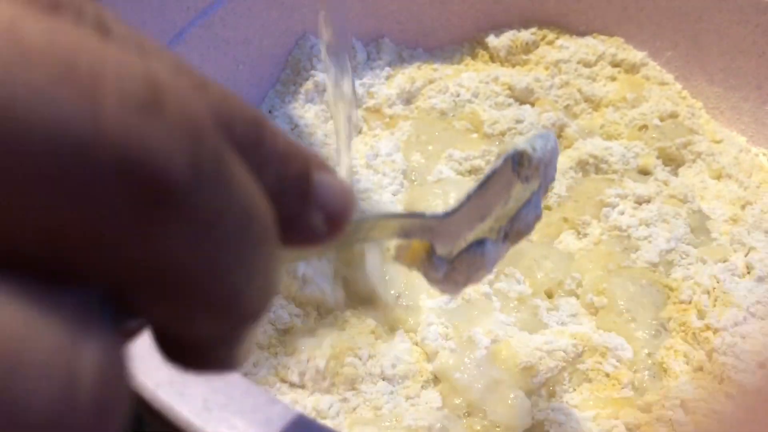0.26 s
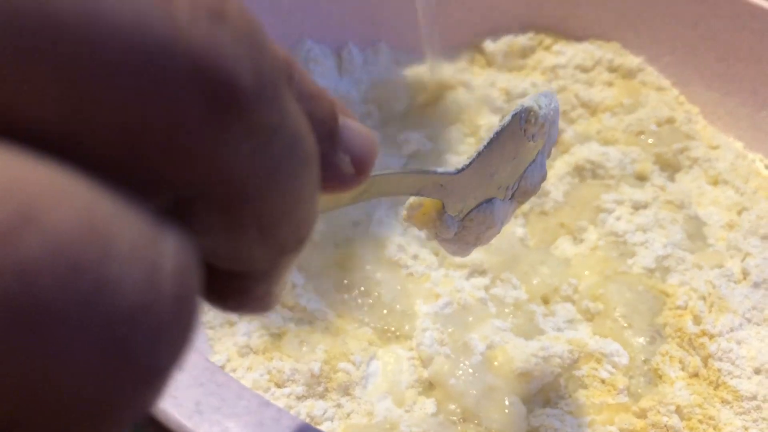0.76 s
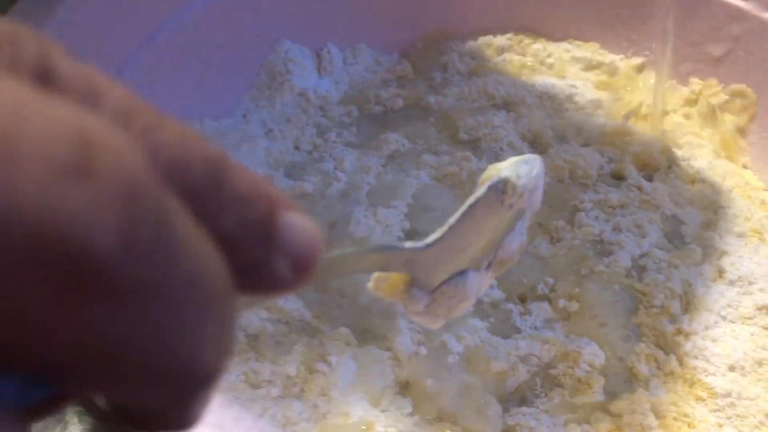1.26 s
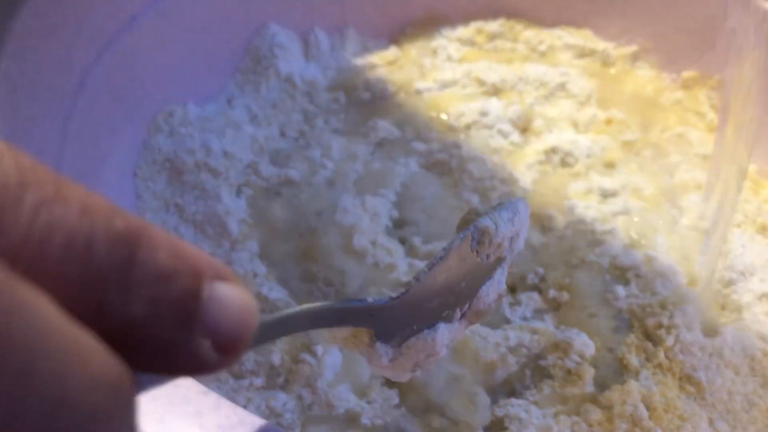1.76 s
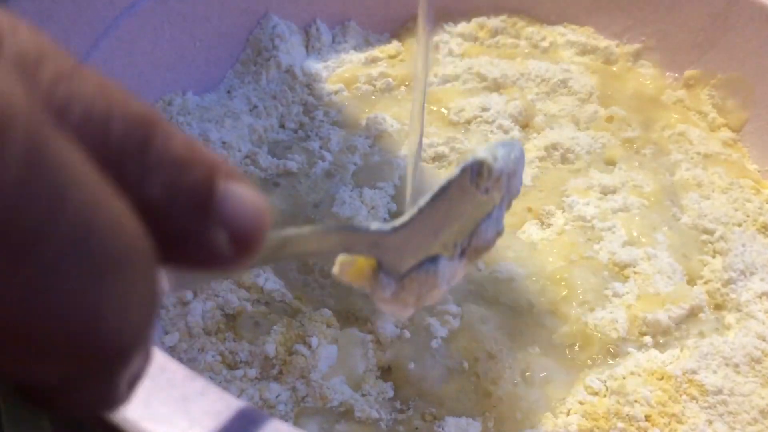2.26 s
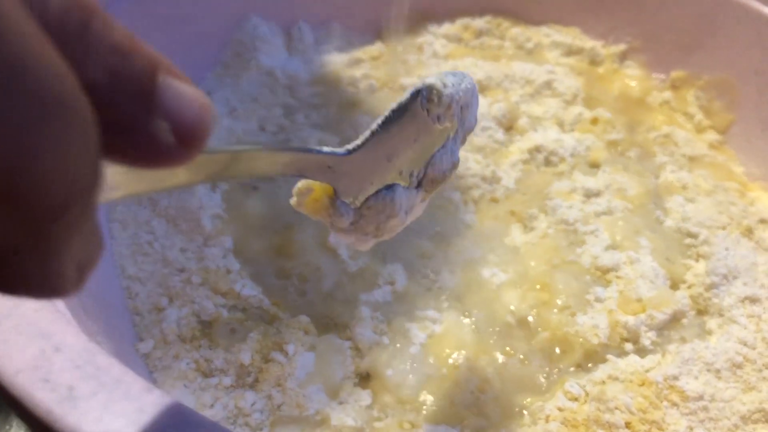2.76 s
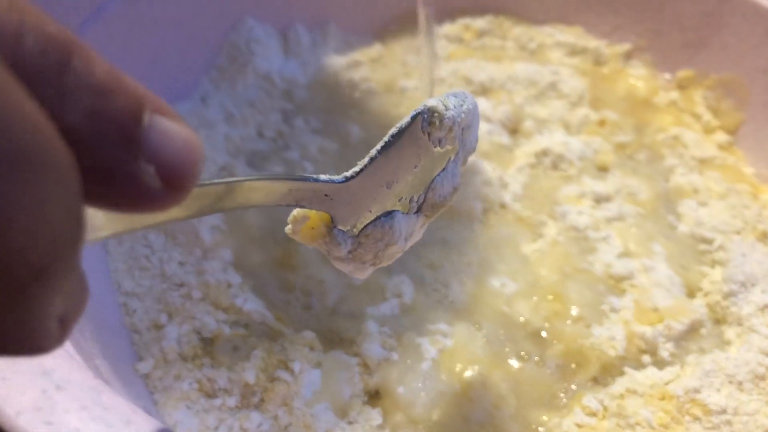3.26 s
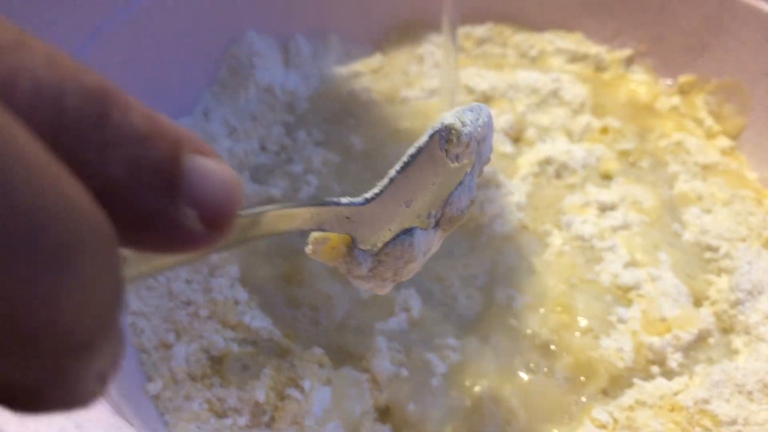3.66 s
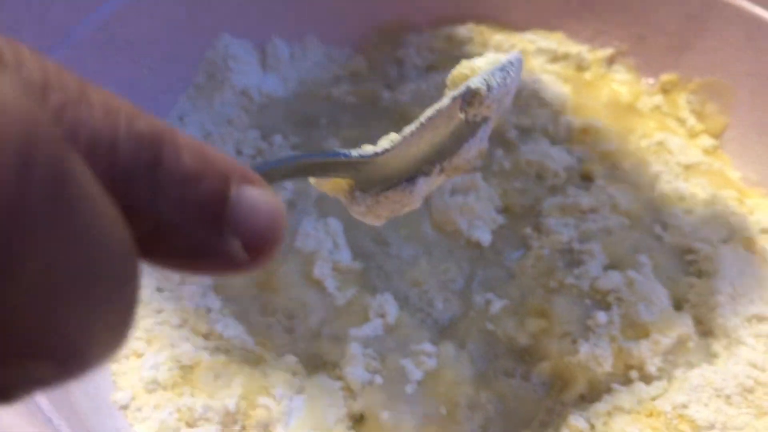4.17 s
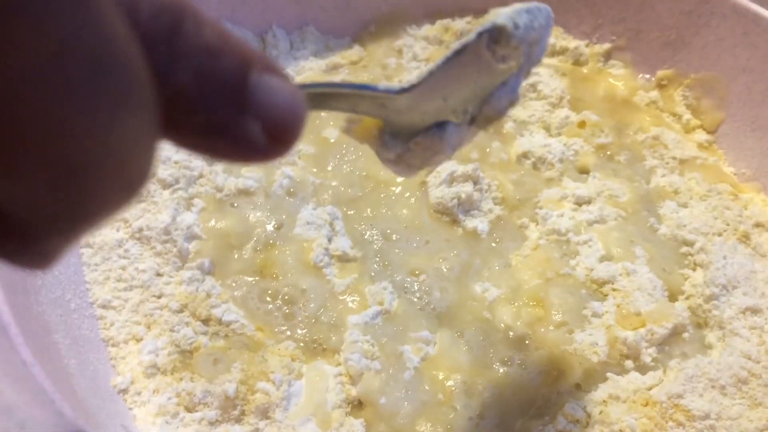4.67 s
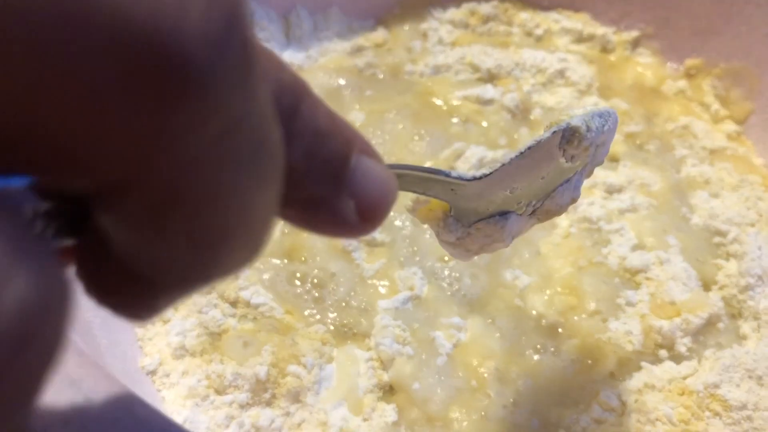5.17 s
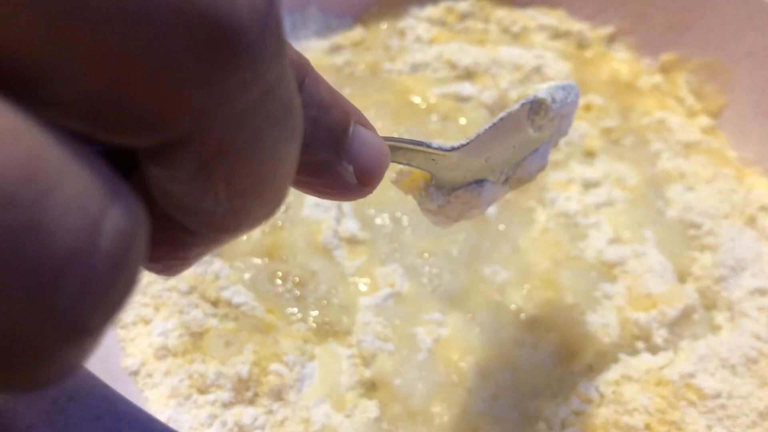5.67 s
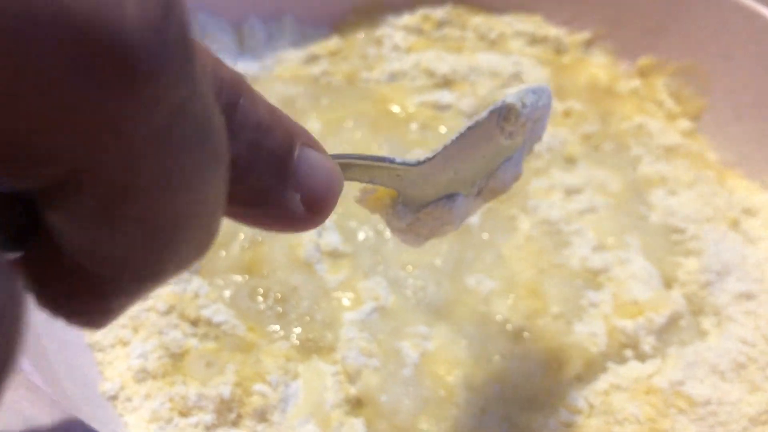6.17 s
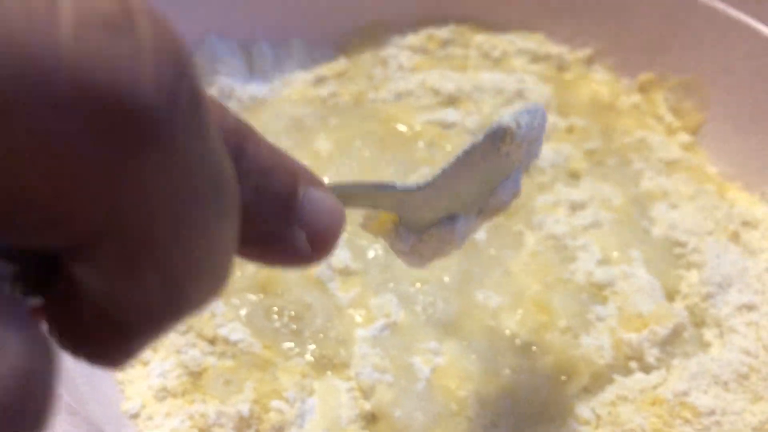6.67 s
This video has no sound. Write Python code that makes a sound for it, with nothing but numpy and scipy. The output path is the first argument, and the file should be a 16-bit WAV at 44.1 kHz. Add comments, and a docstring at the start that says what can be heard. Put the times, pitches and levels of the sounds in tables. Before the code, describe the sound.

Close to the microphone in a small kitchen, a thin stream of water pours onto flour in a plastic bowl with a soft, uneven fizz and tiny bubbles. It breaks into pattering, splashing drops and stops abruptly before four seconds. Faint wet ticks follow, then a kettle shifts on the worktop with light scrapes and woody knocks, the strongest near six and a half. A faint appliance hum rises beneath.

```python
"""In a small kitchen, close to the microphone, a thin stream of hot water is poured onto flour in a plastic bowl.
It fizzes softly (bubble rings and hiss), breaks into pattering drops (chirped clicks, puffs of noise) and stops.
A few wet ticks follow; then the kettle slides and knocks on the worktop, as chirps, ringing modes and woody notes.
An appliance's hum, two wavering tones, rises faintly over dull room noise; the kitchen reverberates."""
import sys
import numpy as np
from scipy import signal
from scipy.fft import rfft, irfft, next_fast_len
from scipy.io import wavfile
from scipy.ndimage import uniform_filter1d, map_coordinates

SR = 44100
rng = np.random.default_rng(int(sys.argv[2]) if len(sys.argv) > 2 else 0)


def generate_wav(signal):
    """Clip the signal to [-1, 1] and save it as 16-bit WAV at the path in sys.argv[1]."""
    frames = np.transpose(np.atleast_2d(signal))
    scaled = np.clip(frames, -1, 1) * 32767
    pcm = np.round(scaled).astype(np.int16)
    wavfile.write(sys.argv[1], SR, pcm)


N = 305613
TIME = np.arange(N) / SR
CUTOFF_HZ = 16000

# Colour of a drop's pat on the bowl: [f/Hz, relative level/dB]
PAT_COLOUR = [(100, -6), (290, -2.5), (460, 5.5), (650, -4), (850, -5), (1100, -2), (1430, -21),
              (1900, -15), (2400, -21.5), (4000, -20.5), (16000, -65)]
# Colour of a splash: [f/Hz, relative level/dB]
SPLASH_COLOUR = [(300, -20), (1050, -2.5), (1450, -7.5), (1900, -3.5), (2900, 0), (4500, -1), (7500, 1.5),
                 (10000, -4), (16000, -18)]
# The kettle's contacts with the worktop:
# [t/s, relative strength/dB, weight behind it/dB, hardness/dB, thunk f/Hz]
CONTACTS = [(5.267, -33.5, -1.5, 3.5, 644), (5.379, -35, -5, -6.5, 660), (5.435, -43.5, 5, -8.5, 666),
            (5.474, -51, 5, -21, 736), (5.557, -41.5, -6, -6, 940), (5.721, -45, -2, -5.5, 666),
            (5.956, -45.5, 14, -4, 710), (5.977, -39, 1, -3, 800), (5.991, -41.5, -13, 5.5, 610),
            (6.016, -46, -5, -7, 830), (6.287, -39.5, -5, -26, 655), (6.448, -37, -10, 5.5, 970),
            (6.46, -27, 7, 10, 1070), (6.47, -26.5, -28, -3, 950), (6.661, -49.5, -8.5, -4, 824),
            (6.692, -46, 5, 3.5, 810), (6.717, -42, -11, 2, 910), (6.745, -44, 6, 1.5, 800),
            (6.761, -39, 20, 8.5, 664), (6.772, -57, 10, -11, 464), (6.81, -51.5, -1, 10, 684),
            (6.839, -63.5, 8, 19.5, 520)]
# Ranges of a contact, from boom, thud, body and clack to crack:
# [low f/Hz, high f/Hz, relative level/dB, contact decay/s, grit share of energy, bending lag/s as in bend()]
CONTACT_RANGES = [(51.3, 155, -1, 0.026, 0.06, 0.005635), (197, 417, -1, 0.0052, 0.52, 0.003224),
                  (470, 900, -6, 0.0063, 0.92, 0.002485), (1330, 3400, 0, 0.0046, 1, 0.002535),
                  (3900, 7400, -4, 0.0031, 1, 0.0027)]


def from_db(db):
    """Level in dB to amplitude."""
    return 10 ** (np.asarray(db) / 20)


def rms_one(x):
    """Scales a sound to an RMS of 1."""
    return x / np.sqrt(np.mean(x ** 2) + 1e-20)


def in_time(rows):
    """Each column of a curve at every sample."""
    s, *columns = np.transpose(rows)
    return [np.interp(TIME, s, column) for column in columns]


def at_hz(points, hz, axis=1):
    """A column of a table read on a log-frequency axis."""
    points = np.array(points)
    return np.interp(np.log(np.maximum(hz, 1)), np.log(points[:, 0]), points[:, axis])


def band(x, low_hz, high_hz, order=2):
    """Keeps one range of frequencies."""
    edges = [low_hz, min(high_hz, SR / 2 - 1)]
    return signal.sosfilt(signal.butter(order, edges, "band", fs=SR, output="sos"), x + 1e-18)


def convolve(x, response):
    """Passes a sound through an impulse response, cut to the scene's length."""
    return signal.fftconvolve(x, response)[:N]


def colour(x, spectrum, size=8192):
    """Causal (minimum-phase) filter of unit energy with the given spectrum."""
    hz = np.arange(size // 2 + 1) * SR / size
    cepstrum = irfft(np.log(from_db(at_hz(spectrum, hz))))
    # Folding the cepstrum forward in time gives minimum phase
    cepstrum[1:size // 2] *= 2
    cepstrum[size // 2 + 1:] = 0
    response = irfft(np.exp(rfft(cepstrum)))
    return convolve(x, response / np.linalg.norm(response))


def drift(rate):
    """Slow random wander of RMS 1, through `rate` random points a second."""
    knots = rng.standard_normal(4096)
    return rms_one(np.interp(TIME * rate, np.arange(len(knots)), knots))


def steady(x, size=4000):
    """Evens out the level over about a tenth of a second."""
    power = uniform_filter1d(uniform_filter1d(x ** 2, size), size // 2)
    return x / np.sqrt(np.abs(power) + 1e-12)


def clicks(times, sizes):
    """Single-sample impulses at the given times in seconds."""
    out = np.zeros(N)
    at = np.clip((np.asarray(times) * SR).astype(int), 0, N - 1)
    np.add.at(out, at, sizes)
    return out


def shower(per_s, spread_db):
    """Clicks at random moments, many small and a few large."""
    out = np.zeros(N)
    at = rng.integers(0, N, 8192)
    sizes = from_db(spread_db * np.minimum(rng.exponential(1, len(at)), np.pi))
    sizes = sizes * rng.choice([-1, 1], len(at))
    number = int(per_s * N / SR)
    out[at[:number]] = sizes[:number]
    return out


def bursts(hits, decay_s):
    """Each click becomes a dying puff of noise of the same energy."""
    r = np.exp(-2 / (decay_s * SR))
    envelope = np.sqrt(signal.lfilter([1 - r], [1, -r], hits ** 2 + 1e-24))
    return envelope * rng.standard_normal(N)


def ring(hits, hz, cycles):
    """A resonance with the energy of its click dies by 60 dB in the given number of cycles."""
    r = from_db(-60 * hz / (cycles * SR))
    w = 2 * np.pi * min(hz, CUTOFF_HZ) / SR
    zeros = np.sqrt((1 - r * r) / 2) * np.array([1, 0, -1])
    return signal.lfilter(zeros, [1, -2 * r * np.cos(w), r * r], hits + 1e-18)


def bend(x, lag_s):
    """Bending waves travel as the root of frequency: a click becomes a quick falling chirp."""
    size = next_fast_len(N + SR)
    hz = np.arange(size // 2 + 1) * SR / size
    # lag_s is how much later 1 kHz arrives than an infinitely high pitch; CUTOFF_HZ itself is not delayed
    cycles = lag_s * (2 * np.sqrt(1000 * hz) - hz * np.sqrt(1000 / CUTOFF_HZ))
    return irfft(rfft(x, size) * np.exp(-2j * np.pi * cycles), size)[:N]


def background():
    """A motor hum of two tones, wavering slightly in pitch and level, over dull room noise."""
    # Colour of the room noise: [f/Hz, relative level/dB]
    room_tone = [(25, -46.5), (45, -16), (64, -10), (90, -19), (135, -8.5), (190, -11), (300, -13),
                 (480, -21.5), (680, -28), (850, -25), (1100, -29.5), (1700, -37), (3600, -39), (8000, -44),
                 (15000, -49.5)]
    # The hum: [t/s, fundamental level/dB, third partial level/dB]
    hum = [(0, -103, -121), (1.5, -79, -81), (3.5, -65, -73), (4.6, -64.5, -66.5), (6.93, -63, -79.5)]
    first_db, third_db = in_time(hum)

    def tone(hz, db):
        level = np.sqrt(2) * from_db(db + 0.54 * drift(1.6))
        wavering_hz = hz + 0.707 * drift(2.186)
        return level * np.sin(2 * np.pi * np.cumsum(wavering_hz) / SR)

    air = from_db(-65) * rms_one(colour(rng.standard_normal(N), room_tone))
    return air + tone(hz=76.8, db=first_db) + tone(hz=225.4, db=third_db)


def foam(centre_hz, per_s, spread_db, octaves, cycles, count=22):
    """Tiny bubbles burst in the wetted flour, loudest near one pitch."""
    out = 0
    for hz in np.geomspace(2000, 13000, count):
        near = np.exp(-.5 * (np.log2(hz / centre_hz) / octaves) ** 2)
        out = out + near * ring(shower(per_s / count, spread_db), hz, cycles)
    return steady(out)


def patter(count=3):
    """Drops land at different distances from the bowl's wall, so their pats fall at different speeds."""
    lags = np.geomspace(.0014, .0042, count)
    return steady(sum(colour(bend(shower(per_s=60, spread_db=4.5), lag), PAT_COLOUR) for lag in lags))


def burble():
    """Larger bubbles gulp briefly where the stream digs into dry flour."""
    # The gulps: [t/s, level/dB]
    gulp_levels = [(0, -77), (.62, -72.5), (.82, -69), (1.18, -62), (1.45, -78), (1.7, -69.5), (2.2, -82),
                   (3.94, -96)]
    level_db, = in_time(gulp_levels)
    pitches_hz = np.geomspace(950, 1700, 6)
    gulps = sum(ring(shower(per_s=51, spread_db=6.0), hz, cycles=8) for hz in pitches_hz)
    return steady(gulps) * from_db(level_db)


def stream():
    """A smooth jet makes the flour fizz; broken up, it spatters and sprays; a hard one adds a fine mist."""
    # Force on wet flour and on the puddle: [t/s, splash relative level/dB, patter relative level/dB]
    pour = [(0, -62, -65), (.09, -68.5, -71.5), (.2, -59, -63.5), (.28, -61.5, -66), (.37, -70.5, -65),
            (.49, -69, -62.5), (.6, -62, -70), (.82, -64.5, -60), (.96, -65.5, -68), (1.22, -59.5, -64.5),
            (1.38, -62, -61), (1.46, -67, -66), (1.57, -62, -64), (1.73, -66, -57), (1.82, -60, -63.5),
            (2.13, -59, -65), (2.35, -61, -57.5), (2.46, -70.5, -58.5), (2.72, -76, -68),
            (2.86, -63.5, -63), (2.95, -77.5, -63), (3.08, -87, -99), (3.11, -64, -58.5), (3.3, -64, -55),
            (3.57, -67, -63.5), (3.73, -58, -50.5), (3.94, -64, -51)]
    # How far the stream has broken into drops: [t/s, 0 smooth jet to 1 separate drops]
    breakup_curve = [(0, 0.064), (.45, 0.22), (.66, 0.16), (.9, 0), (1.22, 0.25), (1.45, 0), (1.7, 0.17),
                     (1.83, 0.39), (2.15, 0), (2.55, 1), (3.05, 0.95), (3.12, 0.049), (3.26, 0.59),
                     (3.38, 0.82), (3.57, 0.52), (3.94, 0.67)]
    # Typical pitch of the bubbles: [t/s, f/Hz]
    fizz_pitch = [(0, 4450), (.7, 5940), (1.0, 4850), (1.35, 5100), (1.7, 3760), (2.15, 6700), (2.4, 4660),
                  (3.94, 4700)]
    # Colour of the hiss within the fizz: [f/Hz, relative level/dB]
    fizz_colour = [(400, -11), (750, 2.5), (1100, 3), (1600, 3.5), (2500, -1.5), (3400, 0.5), (4500, 0),
                   (7000, -1), (10000, -23), (16000, -24)]
    pour_end_s, pour_stop_s, usual_splash_db = 3.94, 0.0031, -61.5
    splash_db, patter_db = in_time(pour)
    breakup, = in_time(breakup_curve)
    fizz_hz, = in_time(fizz_pitch)
    force_db = splash_db - usual_splash_db

    def gain(usual_db, db_per_force_db, breakup_db):
        return from_db(usual_db + db_per_force_db * force_db + breakup_db * breakup)

    splashes = bursts(shower(240, spread_db=6.5), decay_s=.0005)
    drop_bubbles = foam(fizz_hz, per_s=600, spread_db=10.5, octaves=0.67, cycles=17)
    spatter = steady(colour(splashes, SPLASH_COLOUR)) + from_db(-4) * drop_bubbles
    droplets = bursts(shower(300, spread_db=14), decay_s=0.00015)
    spray = steady(band(splashes + droplets, 9100, 14200))

    flutter = from_db(4.5 * drift(90))  # the jet beads as it falls
    hiss = from_db(-5.5) * rms_one(colour(rng.standard_normal(N), fizz_colour))
    bubbles = from_db(-4.5) * foam(fizz_hz, per_s=7500, spread_db=4.5, octaves=.22, cycles=16)
    fizz = flutter * (hiss + bubbles)
    mist = flutter * rms_one(band(rng.standard_normal(N), 6700, 13100))

    surface = spatter * gain(usual_db=-67.5, db_per_force_db=0.97, breakup_db=9.5)
    surface += spray * gain(usual_db=-79.5, db_per_force_db=1.4, breakup_db=21.5)
    surface += fizz * gain(usual_db=-62, db_per_force_db=1.35, breakup_db=-8.5)
    surface += mist * gain(usual_db=-79, db_per_force_db=2.4, breakup_db=7.1)
    flowing = np.clip((pour_end_s - TIME) / pour_stop_s, 0, 1)
    return flowing * (patter() * from_db(patter_db - 2.6) + burble() + surface)


def big_drops():
    """A fat drop gives a falling pat, a sharp splash and the ping of a bursting bubble."""
    # The fattest drops: [t/s, pat relative level/dB, splash relative level/dB, bubble f/Hz]
    fat_drops = [(0.175, -65, -61, 5350), (0.378, -58.5, -58, 4240), (0.573, -72, -55.5, 7000),
                 (0.818, -57, -51, 5640), (0.863, -55, -55, 5360), (1.063, -54.5, -56, 8000),
                 (1.334, -62, -55, 5440), (1.507, -53.5, -56.5, 5000), (1.781, -55, -51, 3600),
                 (1.815, -69, -50, 5500), (1.97, -54.5, -54.5, 5470), (1.997, -56, -51.5, 4400),
                 (2.096, -66, -46, 6340), (2.152, -81, -48, 8750), (2.198, -48, -58, 5560),
                 (2.26, -81, -51, 4230), (2.34, -61, -50, 4900), (2.371, -62, -53, 7350),
                 (2.405, -50, -52.5, 3580), (2.585, -69, -55.5, 11100), (2.619, -55, -59.5, 7560),
                 (2.6403, -61, -54, 5700), (2.697, -77, -59.5, 6500), (2.735, -53, -59, 6350),
                 (2.858, -55, -52, 6160), (2.875, -54.5, -51.5, 3820), (2.939, -57, -61, 5270),
                 (2.992, -78, -54, 7350), (3.063, -69, -65, 5750), (3.082, -72, -61, 6940),
                 (3.098, -53.5, -49.5, 8800), (3.117, -52, -59, 5360), (3.226, -47, -65, 4270),
                 (3.321, -48, -45.5, 4640), (3.336, -55, -45.5, 11000), (3.372, -54.5, -53, 8300),
                 (3.403, -75, -55, 7540), (3.418, -66, -54, 8200), (3.478, -55, -51, 7650),
                 (3.495, -58, -53.5, 4270), (3.656, -60, -58, 4520), (3.6867, -56, -56.5, 4500),
                 (3.702, -75, -49.5, 4350), (3.828, -52, -51, 8400), (3.852, -42, -65, 3240),
                 (3.877, -44.5, -45.5, 4340), (3.913, -55, -46.5, 4000)]
    splash_delay_s = .0018  # after the first touch
    spit_width = 1.45  # the spit is strongest within this ratio of the bubble's pitch
    s, pat_db, splash_db, bubble_hz = np.transpose(fat_drops)
    pats = bend(colour(clicks(s, from_db(pat_db + 23.5)), PAT_COLOUR), lag_s=0.003904)

    bursting = s + splash_delay_s
    hits = clicks(bursting, from_db(splash_db + 19))
    # The first instant, then a spray of droplets
    splash = from_db(-2) * hits + from_db(1.5) * bursts(hits, decay_s=0.0021)
    out = pats + colour(splash, SPLASH_COLOUR) + from_db(-11) * band(splash, 5000, CUTOFF_HZ)
    for t, db, hz in zip(bursting, splash_db, bubble_hz):
        hit = clicks([t], from_db(db))
        ping = ring(from_db(19.5) * hit, hz, cycles=14)
        spit = from_db(24) * bursts(hit, decay_s=.001)
        out += ping + band(spit, hz / spit_width, hz * spit_width)
    return out


def bowl(x, width_s=0.000072, strength=0.13):
    """The curved wall returns a two-lobed echo; its lag follows the stream and sweeps a comb through the splash."""
    # The stream wanders about the bowl: [t/s, distance from the wall/m]
    wall_distance = [(0, 0.11), (.36, 0.12), (1.1, 0.077), (1.9, 0.17), (2.45, 0.1093), (3.94, 0.091)]
    sound_m_per_s = 343
    distance_m, = in_time(wall_distance)
    lag_s = 2 * distance_m / sound_m_per_s

    def late(delay_s):
        return map_coordinates(x, [np.arange(N) - delay_s * SR], order=3)

    echo = late(lag_s - width_s) - late(lag_s)
    return (x + strength * echo) / np.sqrt(1 + 2 * strength ** 2)


def ticks():
    """Faint ticks: air pockets burst in the soaked flour as short puffs of noise around one pitch."""
    # Small wet ticks: [t/s, relative level/dB, f/Hz]
    wet_ticks = [(4.192, -42.5, 2680), (4.4824, -60.5, 4130), (4.6966, -45, 1220), (4.9368, -45, 2850),
                 (5.236, -40.5, 2850)]
    out = np.zeros(N)
    for s, level_db, hz in wet_ticks:
        pop = bursts(clicks([s], from_db(level_db + 19.0)), decay_s=0.0011)
        out += band(pop, hz / 1.47, hz * 1.22) + from_db(-14.5) * band(pop, 2500, 4900)
    return out


def sliding():
    """After each shove the base catches on the worktop in many tiny slips that die away."""
    # Shoves that slide the kettle's base: [t/s, level/dB, fade/(dB per s)]
    shoves = [(5.235, -60.5, 72), (5.36, -62.5, 9), (5.622, -65, 62), (6.219, -62, 29), (6.426, -45, 67),
              (6.45, -55, 118), (6.69, -46, 115)]
    # Colour of the sliding: [f/Hz, relative level/dB]
    scrape_colour = [(150, -9), (400, 6.5), (900, 4), (1500, -2.5), (2300, -10.5), (4000, -14),
                     (8000, -34.5), (16000, -38)]
    attack_s = 0.011
    speed = 0
    for s, db, fade in shoves:
        onset = np.clip((TIME - s) / attack_s, 0, 1)
        speed = speed + onset * from_db(db - fade * np.maximum(TIME - s, 0))
    slips = bursts(shower(per_s=200, spread_db=1.0), decay_s=0.008)
    return steady(bend(colour(slips, scrape_colour), lag_s=0.002856)) * speed


def contact_levels():
    """Weight brings out the low ranges of a contact, hardness the high ones."""
    # How boom, thud, body, clack and crack answer: [relative level/dB, share of weight, share of hardness]
    contact_law = [(-9.5, 0.99, 0.08), (-4.5, 0.31, 0.16), (1, 0, 0), (-10.5, 0, 1.08), (-18.5, 0.17, 1.07)]
    s, strength_db, weight_db, hardness_db, _ = np.transpose(CONTACTS)
    levels = [strength_db + db + heavy * weight_db + hard * hardness_db for db, heavy, hard in contact_law]
    return s, levels


def ringing(s, levels):
    """Each contact wakes every mode of kettle and worktop, as strongly as it hits that range."""
    # Ring of kettle and worktop: [f/Hz, relative level/dB, t60/s]
    rung_modes = [(63.2, 3, 0.42), (156.8, 10, 0.2), (234, 3.5, 0.22), (271.2, 8.5, 0.23), (366, -3, 0.16),
                  (438, -2.5, 0.097), (471, 6.5, 0.14), (747, 11.5, 0.053), (790, 0, 0.21), (813, -5, 0.12),
                  (981, 3.5, 0.12), (1070, -3, 0.06), (1243, 5.5, 0.098), (1680, -3, 0.18),
                  (1758, 8.5, 0.1), (1825, 1.5, 0.16), (1890, -9, 0.25), (2180, -18, 0.1), (2380, -1, 0.11),
                  (2500, -20, 0.1), (2650, -4, 0.1)]
    centres = np.log([np.sqrt(row[0] * row[1]) for row in CONTACT_RANGES])
    hz, mode_db, t60 = np.transpose(rung_modes)
    t = TIME[:SR // 2]
    modes = np.exp(np.outer(2j * np.pi * hz - np.log(1000) / t60, t))
    modes = modes * (1 - np.exp(-t / 0.0012))  # soft onset
    out = np.zeros(N + SR)
    for start, row in zip((s * SR).astype(int), np.transpose(levels)):
        hit_db = np.interp(np.log(hz), centres, row)
        strength = from_db(hit_db + mode_db - 10.5 + rng.normal(0, 0.43, len(hz)))
        phase = np.exp(2j * np.pi * rng.random(len(hz)))
        out[start:start + len(t)] += ((strength * phase) @ modes).real
    return out[:N]


def knocks():
    """Gritty contacts send bending waves through the worktop, the lowest last; the base rattles a little after."""
    s, levels = contact_levels()
    out = ringing(s, levels)
    rattle = from_db(1.8 * drift(160))
    for level_db, (low_hz, high_hz, trim_db, decay_s, grit, lag_s) in zip(levels, CONTACT_RANGES):
        # Narrow ranges get larger clicks, since they pass less of a click's energy
        hits = clicks(s, from_db(level_db + trim_db + 27.0) * np.sqrt(SR / 2 / (high_hz - low_hz)))
        clean = np.sqrt(1 - grit) * hits
        gritty = np.sqrt(grit) * bursts(hits, decay_s)
        after = from_db(-12.0) * np.sqrt(grit) * rattle * bursts(hits, decay_s=0.027)
        out += bend(band(clean + gritty + after, low_hz, high_hz), lag_s)
    crackle = bursts(clicks(s, from_db(levels[-1] + 20.5)), decay_s=0.014)
    return out + band(crackle, 3700, 12900)


def worktop(x):
    """Between its modes the board mostly radiates less; a few narrow ranges are lifted."""
    # Antiresonances, and slight lifts where positive: [f/Hz, width/Hz, level change/dB]
    hollows = [(119, 35, -0.5), (196, 8.2, 3), (349, 150, -2.5), (590, 110, -25), (847, 11, 3.5),
               (1415, 54, -21), (2890, 460, -8.5)]
    for hz, width_hz, change_db in hollows:
        peak = signal.lfilter(*signal.iirpeak(hz, hz / width_hz, fs=SR), x)
        x = x - (1 - from_db(change_db)) * peak
    return x


def thunks():
    """Each contact has a short woody note, whose pitch depends on where the base touches."""
    notes = 0
    for s, strength_db, _, _, hz in CONTACTS:
        notes = notes + ring(clicks([s], from_db(strength_db + 23.5)), hz, cycles=9.0)
    return bend(band(notes, 400, 1620), lag_s=0.0017)


def kitchen(x, count=11):
    """Diffuse reverberation that builds up quickly and dies band by band."""
    # Kitchen reverberation: [f/Hz, relative level/dB, t60/s]
    reverberation = [(97, -6, 0.74), (267, 5, 0.52), (740, -1.5, 0.29), (1970, 2, 0.36), (4760, 2, 0.3),
                     (14200, 3.5, 0.22)]
    t, response = TIME[:SR], 0
    edges = np.geomspace(45, CUTOFF_HZ, count + 1)
    for low, high in zip(edges, edges[1:]):
        hz = np.sqrt(low * high)
        decay = np.exp(-np.log(1000) * t / at_hz(reverberation, hz, axis=2))
        noise = band(rng.standard_normal(SR), low, high)
        response = response + noise * from_db(at_hz(reverberation, hz)) * decay
    response = response * (1 - np.exp(-t / 0.0012))
    return convolve(x, response / np.linalg.norm(response))


def scene():
    """Water in the bowl, then the kettle on the worktop, in a kitchen that answers both."""
    water = bowl(stream() + big_drops()) + ticks()
    kettle = worktop(knocks() + sliding()) + thunks()
    reverberant = kitchen(from_db(-17.5) * water + from_db(-9.5) * kettle)
    return (water + kettle + reverberant + background())[None]


def record(dry):
    """The deep bass is rolled off and the top is cut."""
    thin = signal.sosfilt(signal.butter(4, 48, "high", fs=SR, output="sos"), dry)
    return signal.sosfilt(signal.ellip(10, .2, 70, CUTOFF_HZ, fs=SR, output="sos"), thin)


dry = scene()
out = record(dry)
generate_wav(out)
```